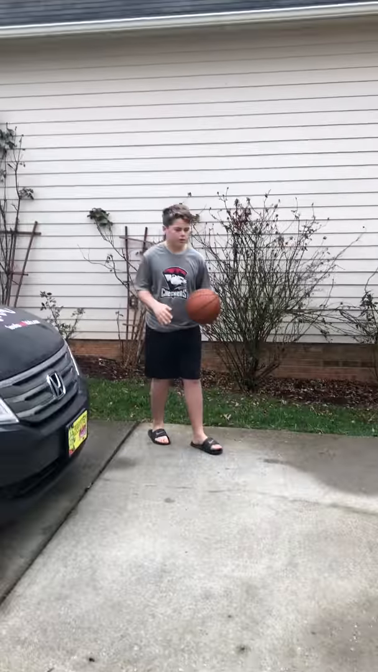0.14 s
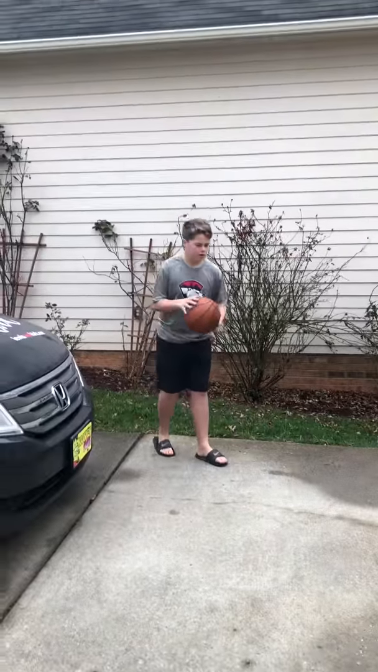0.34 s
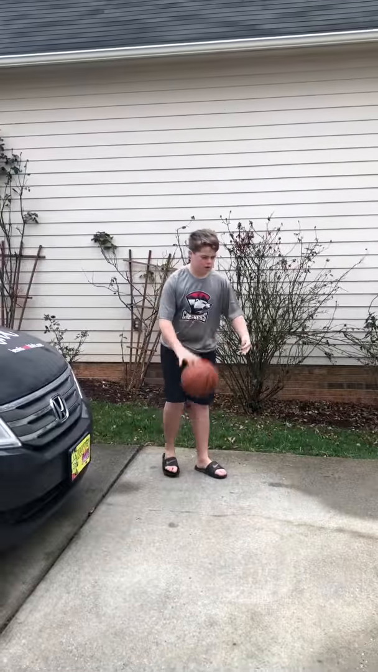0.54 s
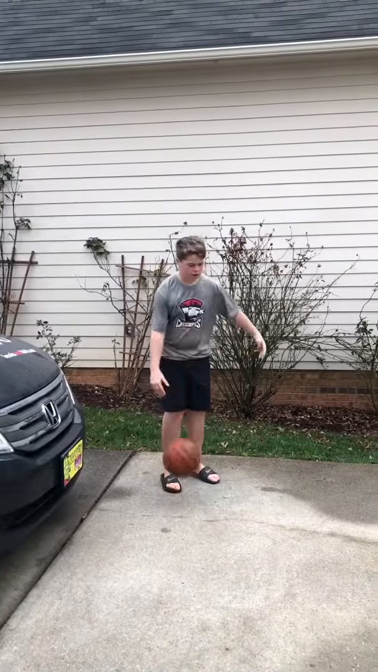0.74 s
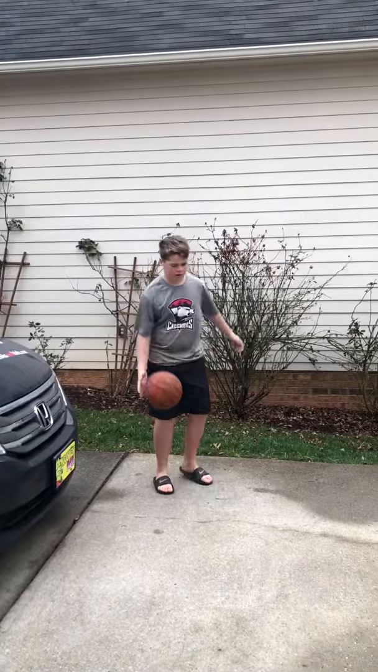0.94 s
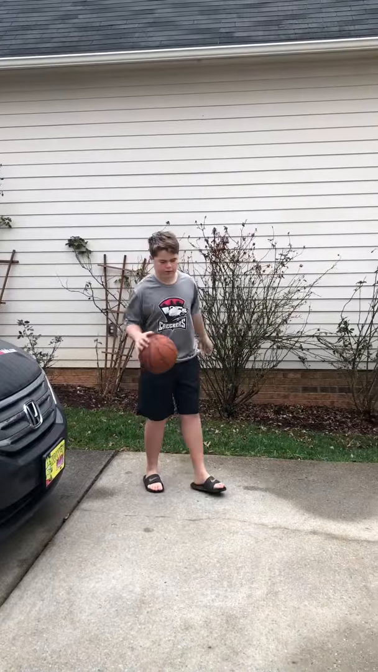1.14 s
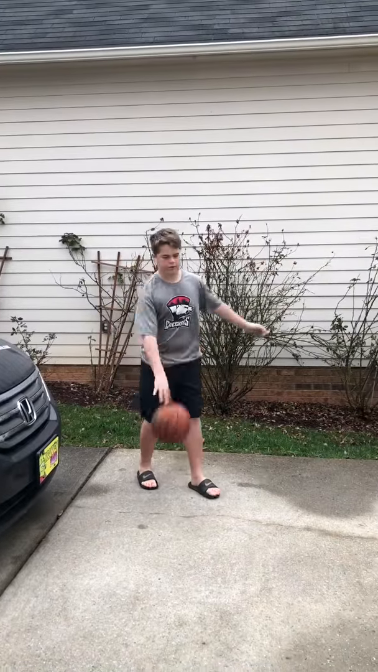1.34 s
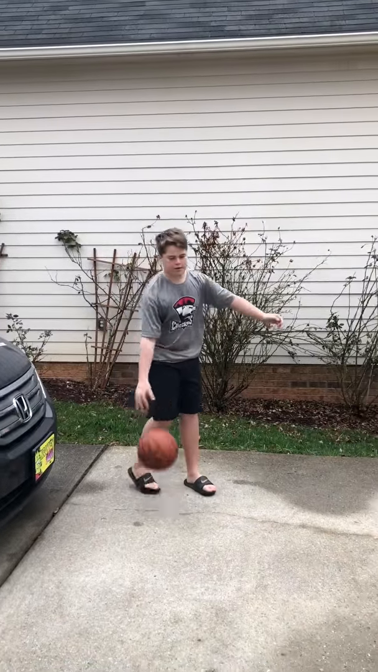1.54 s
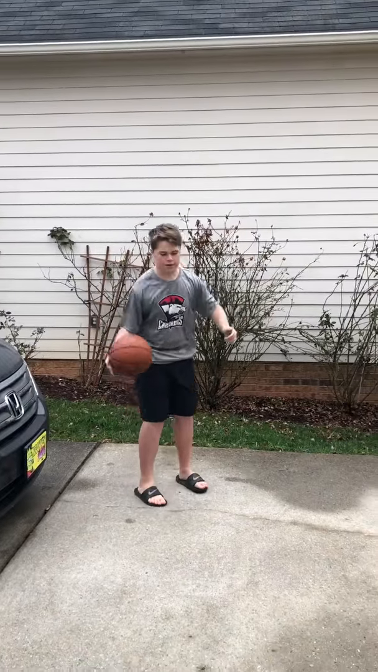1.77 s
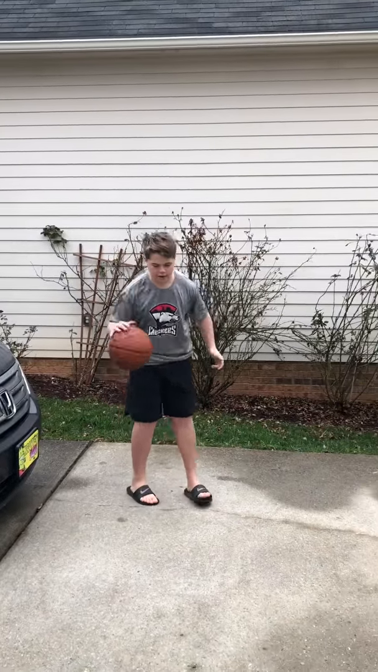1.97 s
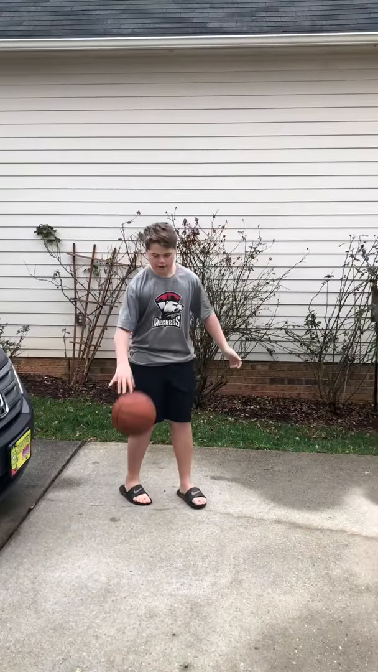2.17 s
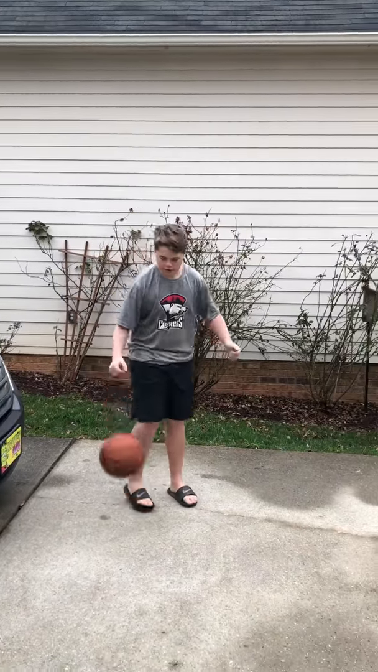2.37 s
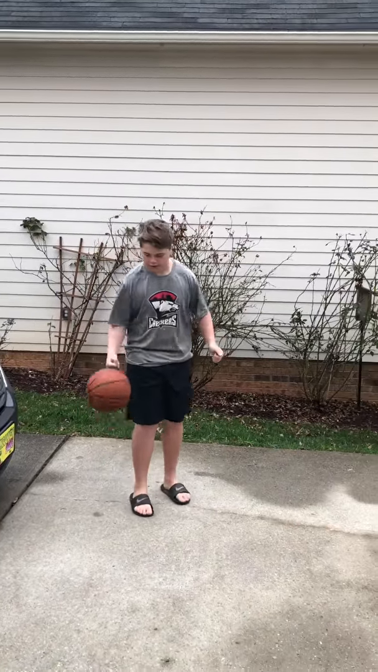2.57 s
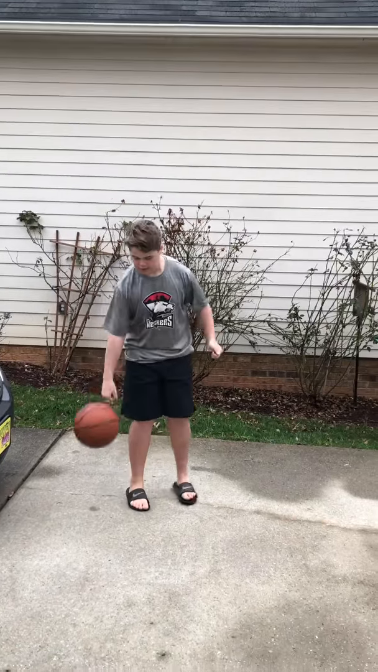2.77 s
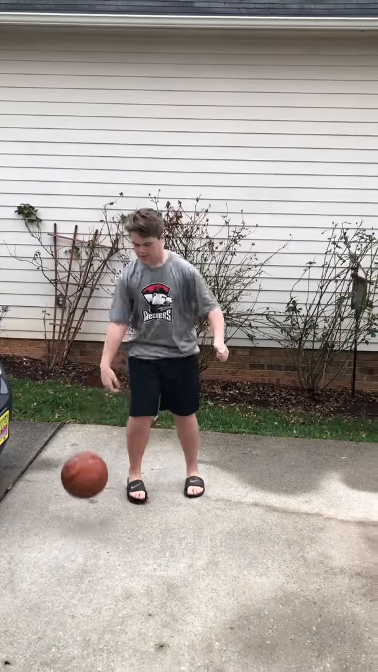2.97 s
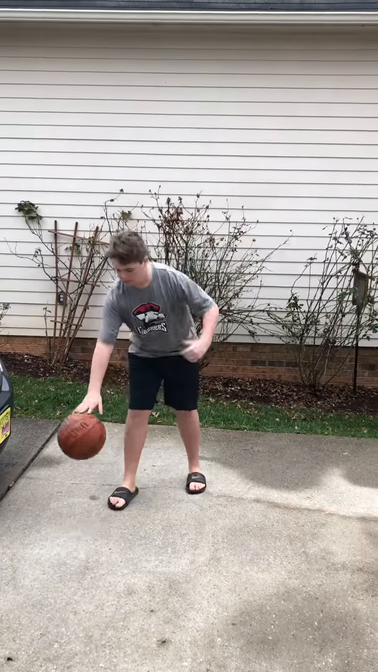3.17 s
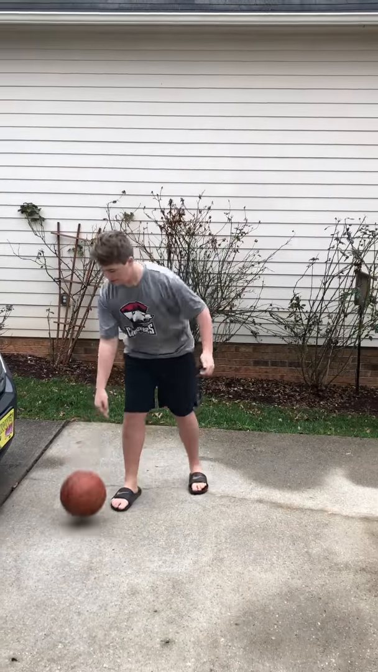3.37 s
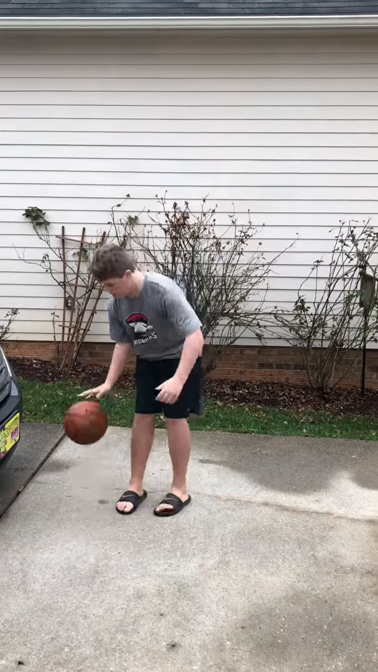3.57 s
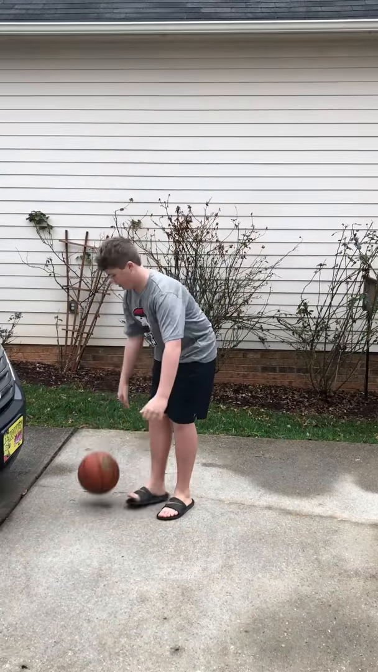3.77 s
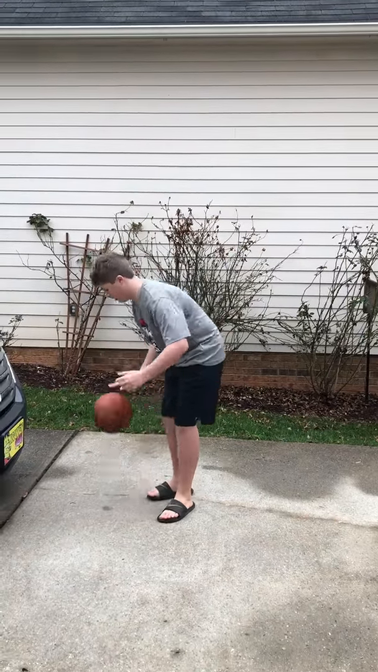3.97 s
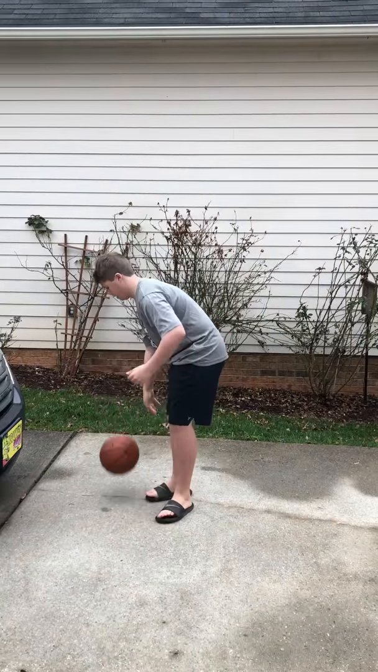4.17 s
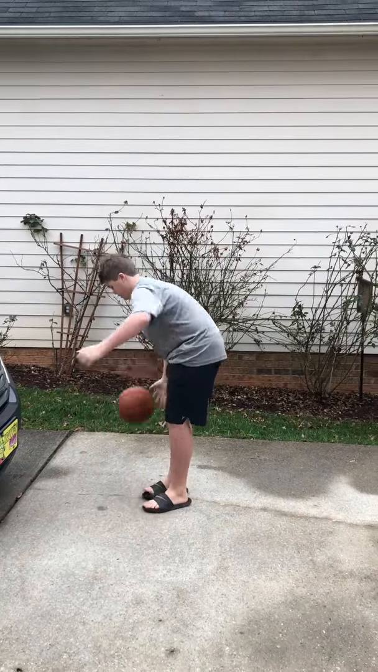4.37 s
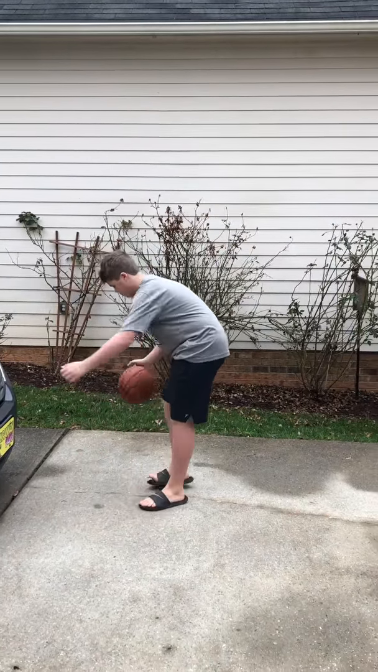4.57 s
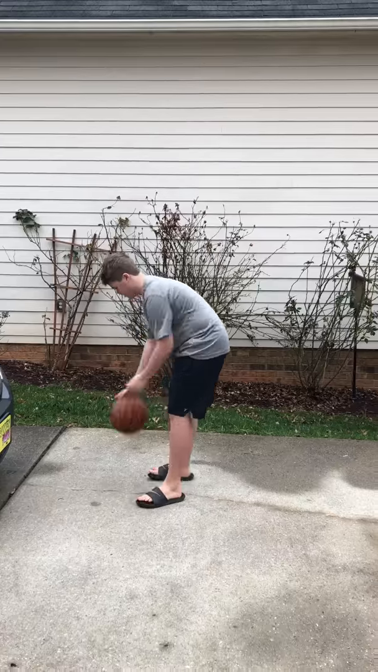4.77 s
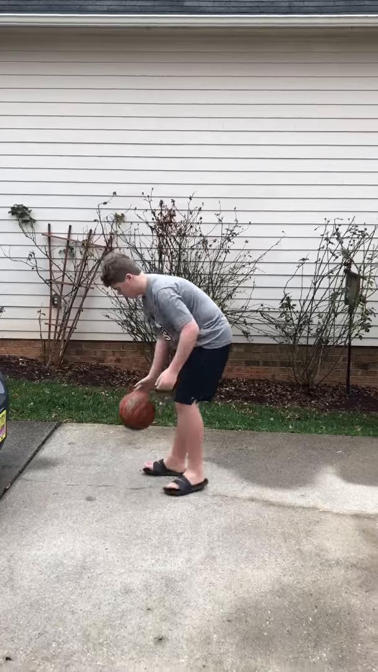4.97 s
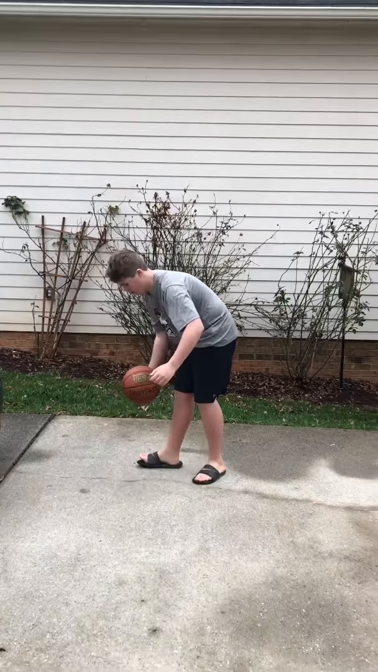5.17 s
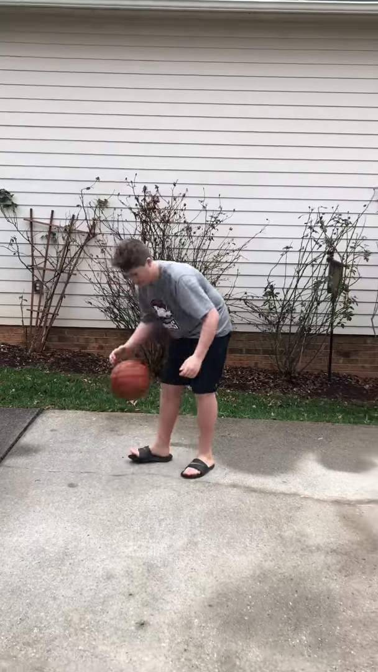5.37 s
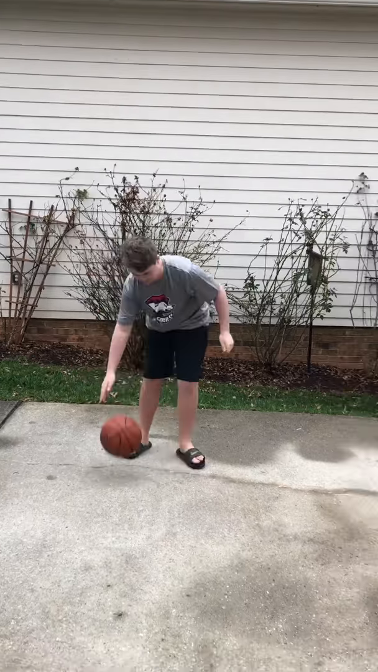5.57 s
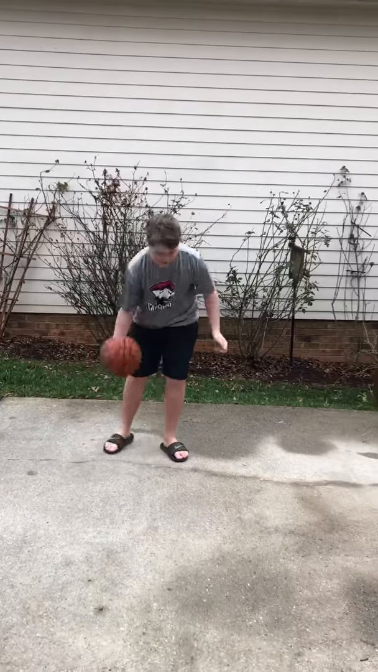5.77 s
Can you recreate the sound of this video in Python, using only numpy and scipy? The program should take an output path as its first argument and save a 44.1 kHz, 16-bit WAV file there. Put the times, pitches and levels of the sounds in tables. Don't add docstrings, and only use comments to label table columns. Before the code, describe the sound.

Nine basketball bounces on a driveway, the third loudest and bright, the fourth softer, then closer together with varied tone, ending on a hard dark one. Light hand pats, small grit snaps and dragging soles fill the gaps, busier in the second half. The house wall and parked car return short slapback; distant suburb noise and hum sit very low, heard on a phone microphone.

```python
import sys
import numpy as np
from scipy import signal
from scipy.io import wavfile

SR = 44100
rng = np.random.default_rng(int(sys.argv[2]) if len(sys.argv) > 2 else 0)


def materialize(psi):
    bounded = np.clip(np.atleast_2d(psi).T, -1, 1)
    quanta = np.round(bounded * 32767).astype(np.int16)
    wavfile.write(sys.argv[1], SR, quanta)


def voltage_ratio(level):
    return 10 ** (np.asarray(level, float) / 20)


N = 256662

# (time [s], slap peak [dB], shell re slap [dB], thud re slap [dB], slap centre [Hz])
BOUNCES = [
    (0.7381, -12, -6.5, -9.5, 1300),
    (1.478, -9, -9.5, -11, 1080),
    (2.3223, -8, -11, -13.5, 2380),
    (2.951, -17, -13, -9, 1280),
    (3.3707, -10.5, -12, -17.5, 2550),
    (3.7952, -14, -10.5, -12.5, 1140),
    (4.2296, -16.5, -2.5, -11.5, 1520),
    (4.882, -12.5, -13, -15.5, 2470),
    (5.5795, -9.5, -8.5, -11, 1160),
]


def band(x, low_hz, high_hz, order=2):
    sos = signal.butter(order, [low_hz, min(high_hz, 0.45 * SR)], "band", fs=SR, output="sos")
    return signal.sosfilt(sos, x)


def rms_one(x):
    return x / np.sqrt(np.mean(x ** 2) + 1e-20)


def clicks(times_s, db, signs=1):
    out = np.full(N, 1e-18)
    np.add.at(out, np.round(np.asarray(times_s) * SR).astype(int), signs * voltage_ratio(db))
    return out


def ring(x, hz, t60_s):
    r, w = voltage_ratio(-60 / (t60_s * SR)), 2 * np.pi * hz / SR
    return signal.lfilter([0, np.sin(w)], [1, -2 * r * np.cos(w), r * r], x)


def swell(times_s, db, hz, peak_s):
    out, t = np.zeros(N), np.arange(SR // 10) / SR
    shape = t / peak_s * np.exp((1 - (t / peak_s) ** 2) / 2)
    for s, level_db, pitch_hz in np.broadcast(times_s, db, hz):
        i = round(s * SR)
        tone = voltage_ratio(level_db) * shape * np.sin(2 * np.pi * pitch_hz * t)
        out[i:i + len(t)] -= tone[:N - i]
    return out


def drift(rate_hz):
    r = np.exp(-2 * np.pi * rate_hz / SR)
    return rms_one(signal.lfilter([1], [1, -2 * r, r * r], rng.standard_normal(N + SR))[SR:])


def bounces():
    # (frequency [Hz], level [dB], time to peak [s])
    shell_modes = [(294.5, -0.5, 0.0026), (491, -9.5, 0.0017)]
    # (frequency [Hz], level [dB], time to peak [s])
    thud_modes = [(103, -2.5, .013), (145, -1.5, 0.011)]
    # (frequency [Hz], level [dB], t60 [s])
    slap_modes = [(950, -3, .006), (1300, 0, .006), (1700, -1, .005), (2300, 0, .004), (3000, -2, .004),
                  (3900, -6, .003), (5300, -10, .003)]
    # (frequency [Hz], level [dB], t60 [s])
    air_modes = [(2170, -38, .3)]
    # (time [s], path [m])
    wall_detour = [(.74, 7.5), (2.32, 8.55), (2.95, 8.5), (3.37, 8.75), (4.23, 7.8), (4.88, 7.5),
                   (5.58, 8.2)]
    # (time [s], level [dB])
    first_echo = [(1.4, -11.5), (2.4, -16.5), (4.2, -6.5), (4.9, -9.5), (5.55, -56)]
    shell_lag_s, thud_lag_s, contact_s = 0.0016, 0.0034, 0.003

    s, slap_db, shell_db, thud_db, slap_hz = np.transpose(BOUNCES)
    wall_lags_s = np.interp(s, *np.transpose(wall_detour)) / 343
    wall_db = np.interp(s, *np.transpose(first_echo))
    out = np.zeros(N)
    for hz, db, peak_s in shell_modes:
        out += swell(s + shell_lag_s, slap_db + shell_db + 13.0 + db, hz, peak_s)
    for k, (hz, db, peak_s) in enumerate(thud_modes):
        out -= (-1) ** k * swell(s + thud_lag_s, slap_db + thud_db + 1.0 + db, hz, peak_s)

    late_s = contact_s * (np.arange(1, 5) + rng.uniform(-0.7, 0.5, (len(s), 4))) / 4
    signs, near = rng.choice([-1, 1], (len(s), 4)), np.zeros(N)
    modes = slap_modes + air_modes
    chance_db = 1.5 * rng.standard_normal((len(s), len(modes)))
    for k, (hz, db, t60_s) in enumerate(modes):
        level_db = slap_db - 1.5 + db - 14.8 * np.abs(np.log2(hz / slap_hz)) + chance_db[:, k]
        jolts = np.zeros(N)
        for j in range(4):
            jolt_db = level_db - 4 - 2.0 * j * np.log2(hz / 900)
            jolts += clicks(s + late_s[:, j], jolt_db, signs[:, j])
        out -= ring(clicks(s, level_db), hz, t60_s)
        near += ring(jolts, hz, t60_s)

    heard = out + near
    for i, reply in zip(np.round(s * SR).astype(int), yard_replies(wall_lags_s, wall_db)):
        echo = signal.fftconvolve(out[i:i + SR // 3], reply)[:N - i]
        heard[i:i + len(echo)] += echo
    return heard


def pats():
    # (time [s], peak [dB], pitch [Hz], slap re peak [dB])
    pat_events = [
        (0.987, -49, 554, 10),
        (2.616, -45, 524, -15),
        (3.214, -34, 248, 3),
        (3.646, -32.5, 286, 1.5),
        (3.963, -37.5, 240, 8.5),
        (4.081, -24.5, 396, 1.5),
        (4.483, -37, 230, 0),
        (4.681, -28, 322, -1),
        (5.175, -34.5, 498, 7.5),
        (5.464, -36, 545, 11),
    ]
    # (multiple of its pitch [ratio], level [dB])
    knock_tones = [(.55, 0.5), (1.001, 6), (1.7, -4.5), (2.6, -4)]
    s, db, hz, slap_db = np.transpose(pat_events)
    puff = signal.lfilter([1], [1, -voltage_ratio(-60 / (0.015 * SR))], clicks(s, db + slap_db + 3))
    knock = np.zeros(N)
    for ratio, tone_db in knock_tones:
        knock += swell(s, db - 8.0 + tone_db, hz * ratio, 0.0046 / np.sqrt(ratio))
    return knock + puff * band(rng.standard_normal(N), 530, 2060)


def sandals():
    # (time of most pressure [s], hiss [dB], fade [s], low rasp re hiss [dB])
    drags = [(0.342, -62.5, 0.029, -7), (0.419, -55.5, 0.044, -37), (0.674, -69, 0.062, 9),
             (.87, -66, 0.076, -25), (0.984, -50, 0.038, -46), (1.11, -56, 0.067, -5),
             (1.27, -55, 0.043, -3.5), (1.68, -74, 0.021, -3), (1.84, -55, 0.047, -3),
             (2.0, -54, 0.053, -25), (2.2, -68, 0.39, -1), (2.509, -55.5, 0.012, 2), (2.631, -63, 0.27, -7),
             (2.791, -45.5, 0.073, -4.5), (2.88, -48.5, 0.033, -4), (3.019, -51, 0.018, -20),
             (3.189, -57.5, 0.028, -18), (3.33, -61.5, 0.12, -5), (3.605, -51.5, 0.036, -25),
             (3.792, -34.5, 0.043, -7.5), (3.96, -55.5, 0.037, -26), (4.212, -49.5, 0.048, -7),
             (4.37, -66, 0.043, -7), (4.52, -63.5, 0.047, -2), (4.7, -41.5, 0.019, -3),
             (4.912, -46, 0.07, 1), (5.145, -43.5, 0.046, -17), (5.423, -47, 0.065, -3),
             (5.523, -46, 0.028, -2), (5.628, -40, 0.038, -8)]
    # (time [s], peak [dB],
    # low rasp re peak [dB])
    snaps = [(0.3925, -36.5, -24), (.9735, -31, -36), (1.0692, -39, 8.5), (1.2973, -34.5, -4.5),
             (1.6484, -28.5, 2.5), (1.6532, -22.5, -24), (1.845, -47, 12), (1.949, -31.5, -13),
             (1.984, -33.5, -31), (2.006, -33, -22), (2.0248, -38, 3.5), (2.0649, -38.5, -12),
             (2.189, -45.5, -14), (2.232, -48, -18), (2.4935, -39, -20), (3.0184, -49, 0),
             (3.183, -35.5, -2), (3.5703, -31, -16), (3.5856, -25.5, -3), (3.7385, -30.5, -40),
             (3.9399, -31.5, -30), (4.0816, -32.5, -13), (4.3406, -37, -10), (4.682, -34, -16),
             (4.8739, -23.5, -32), (5.3851, -30, -13), (5.4166, -27, -3), (5.4243, -34, -7),
             (5.4444, -30.5, 0), (5.49, -37, -19)]
    rise_share, foot_edge = 1, 0.79
    light_db, firm_db = -57, -48
    snap_t60_s, snap_growth, snap_rise_s = 0.022, 0.59, 0.0018
    crunch_db, crunch_low_db, crunch_lead_s, crunch_t60_s = -4.5, 9.5, 0.00087, 0.01
    sand_db_per_octave = 3

    hiss, rasp = grit()
    t, judder, out = np.arange(N) / SR, crackle(), np.zeros(N)
    for s, db, fall_s, low_db in drags:
        rise_s = rise_share * fall_s
        grainy = np.interp(db, [light_db, firm_db], [1.0, 0.35])
        span = slice(round((s - rise_s) * SR), round((s + fall_s) * SR))
        since_s = t[span] - s
        phase = np.clip(since_s / np.where(since_s < 0, rise_s, fall_s), -1, 1)
        pressure = np.cos(np.pi / 2 * phase).clip(0) ** foot_edge
        out[span] += voltage_ratio(db) * pressure * judder[span] ** grainy * (hiss[span] + voltage_ratio(low_db) * rasp[span])

    crunches = []
    for s, slap_db, *_, hz in BOUNCES:
        db = slap_db + crunch_db - sand_db_per_octave * np.log2(hz / 1500)
        crunches.append((s - crunch_lead_s, db, crunch_low_db))
    for k, (onset_s, db, low_db) in enumerate(snaps + crunches):
        s = onset_s + 0.0008
        span = slice(round(s * SR), round(s * SR) + SR // 8)
        since_s = t[span] - s
        if k >= len(snaps):
            shape = voltage_ratio(-60 * since_s / crunch_t60_s)
        else:
            t60_s = np.clip(snap_t60_s * voltage_ratio(snap_growth * (db + 30)), 0.003, 0.022)
            shape = voltage_ratio(-60 * since_s / t60_s) * np.clip(since_s / snap_rise_s, 0, 1)
            shape = shape * judder[span] ** 0.25 * voltage_ratio(7.5)
        out[span] += voltage_ratio(db - 9) * shape * (hiss[span] + voltage_ratio(min(low_db, 14)) * rasp[span])
    return out + voltage_ratio(-90 + 4.4 * drift(2)) * hiss


def grit():
    sizes = voltage_ratio(3.0 * np.minimum(rng.exponential(1, N), 3)) * rng.choice([-1, 1], N)
    struck = rng.random(N) < 3000 * voltage_ratio(4.0 * drift(60)) / SR
    grains = sizes * struck + 1.2 * rng.standard_normal(N)
    hiss = band(np.diff(grains, prepend=0) * 0.22 + grains, 2700, 6670, order=1)
    rasp = band(grains, 1172, 4680, order=3)
    return rms_one(hiss), rms_one(rasp)


def crackle():
    cracks = (rng.random(N) < 150 / SR) * 2.0 * np.minimum(rng.exponential(1, N), 2.5)
    jumps = 1 + signal.lfilter([1], [1, -voltage_ratio(-60 / (0.005 * SR))], cracks)
    lumps_db = 4.0 * band(drift(90), 30, 200) * 1.6
    return rms_one(jumps * voltage_ratio(lumps_db))


def yard_replies(wall_lags_s, wall_db):
    # (delay [s], level [dB], low-pass cut [Hz])
    far_echoes = [(0.048, -79.5, 2000), (0.076, -53.5, 1520)]
    # (frequency [Hz], level [dB], t60 [s])
    scatter = np.array([(89, -12, 0.51), (306, -10.5, 0.38), (790, -7, 0.39), (2000, -11, 0.55),
                        (4060, -14.5, 0.53), (10000, -5.5, 0.18)])
    car_db, car_t60_s = -3, 0.042

    t = np.arange(SR // 2) / SR
    reply = np.zeros((len(wall_lags_s), len(t)))
    reply[np.arange(len(reply)), np.round(np.array(wall_lags_s) * SR).astype(int)] = voltage_ratio(wall_db)
    reply = signal.sosfilt(signal.butter(1, 2500, fs=SR, output="sos"), reply)
    for s, db, cut_hz in far_echoes:
        click = voltage_ratio(db) * (np.arange(len(t)) == round(s * SR))
        reply += signal.sosfilt(signal.butter(1, cut_hz, fs=SR, output="sos"), click)

    edges_hz = 50 * 2 ** np.arange(0, 8.6, 0.5)
    white = rng.standard_normal((2, *reply.shape))
    for j, (low, high) in enumerate(zip(edges_hz, edges_hz[1:])):
        db, t60_s = (np.interp(np.log(low * high) / 2, np.log(scatter[:, 0]), scatter[:, k]) for k in (1, 2))
        rise_s = 0.004 + 3 / low
        shape = voltage_ratio(db - 60 * t / t60_s) * np.clip(t / rise_s, 0, 1) / np.sqrt(SR / 50)
        reply += shape * band(white[j % 2], low, high)
    quick = voltage_ratio(car_db - 60 * t / car_t60_s) * np.clip(t / 0.0021, 0, 1) / np.sqrt(SR / 400)
    return reply + quick * band(white[0, :, ::-1], 780, 3100)


def suburb():
    # (frequency [Hz], density [dB per Hz])
    spectrum = np.array([(25, -23), (50, 6.5), (100, -11.5), (200, -6.5), (1000, -16.5), (2500, -25.5),
                         (6000, -31), (16000, -38.5)])
    suburb_db, fan_hz, fan_width_hz, fan_db = -56.5, 125.1, 3.7, -58
    edges_hz, out = 25 * 2 ** np.arange(0, 9.6, 0.5), np.zeros(N)
    white = rng.standard_normal((2, N))
    for k, (low, high) in enumerate(zip(edges_hz, edges_hz[1:])):
        db = np.interp(np.log(low * high) / 2, np.log(spectrum[:, 0]), spectrum[:, 1])
        patches_db = 1.8 * drift(2)
        out += voltage_ratio(db + patches_db) * band(white[k % 2], low, high)
    hum = band(rng.standard_normal(N), fan_hz - fan_width_hz / 2, fan_hz + fan_width_hz / 2, order=1)
    return voltage_ratio(suburb_db) * rms_one(out) + voltage_ratio(fan_db) * rms_one(hum)


def scene():
    small = pats() + sandals()
    small_echo = signal.fftconvolve(small, yard_replies([0.0222], -11.0)[0])[:N]
    return (bounces() + small + small_echo + suburb())[None]


def low_pass(x):
    return signal.sosfilt(signal.butter(12, 17000, fs=SR, output="sos"), x)


def record(dry):
    start_s = 0.2635
    x = signal.sosfilt(signal.butter(4, 52, "high", fs=SR, output="sos"), dry)
    x = signal.sosfilt(signal.cheby2(10, 25, 16450, fs=SR, output="sos"), x)
    x = 0.8 * np.tanh(x / 0.8)
    x = x * (np.arange(N) / SR > start_s)
    return low_pass(x)


dry = scene()
out = record(dry)
materialize(out)
```